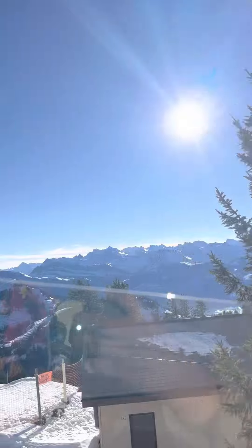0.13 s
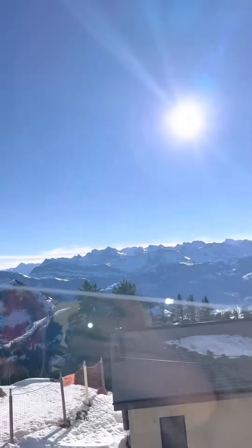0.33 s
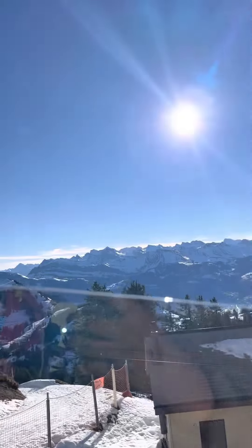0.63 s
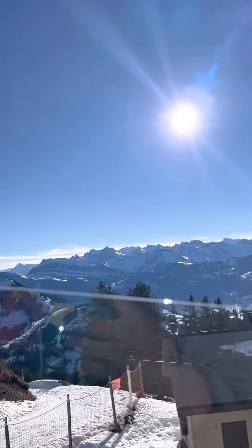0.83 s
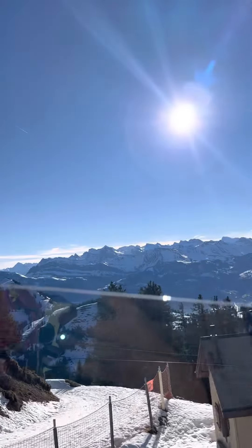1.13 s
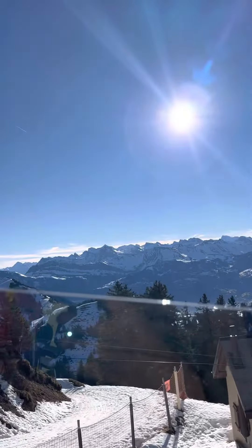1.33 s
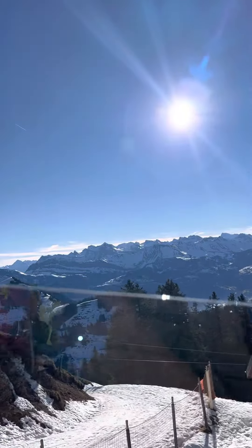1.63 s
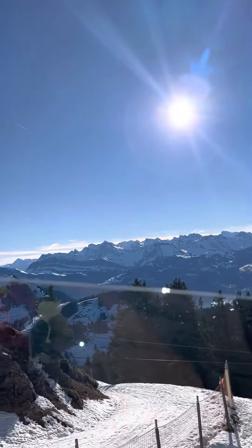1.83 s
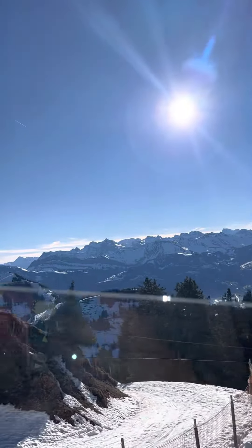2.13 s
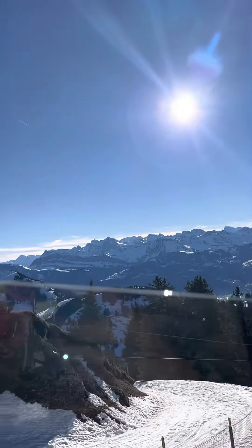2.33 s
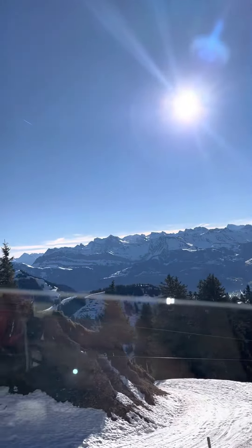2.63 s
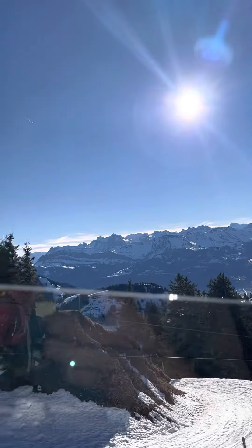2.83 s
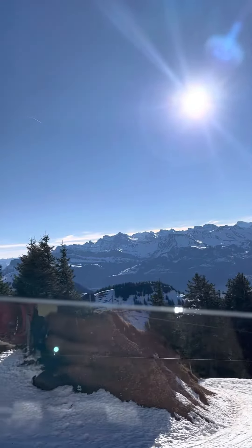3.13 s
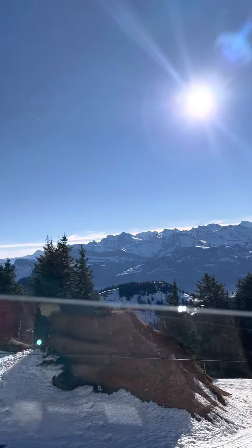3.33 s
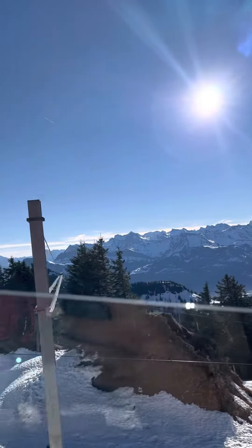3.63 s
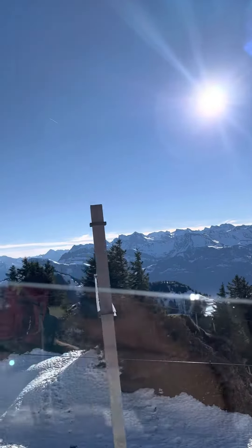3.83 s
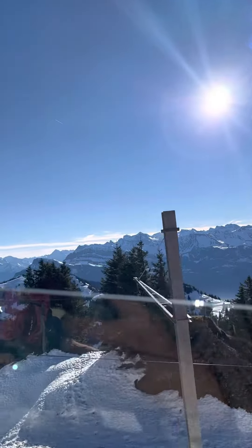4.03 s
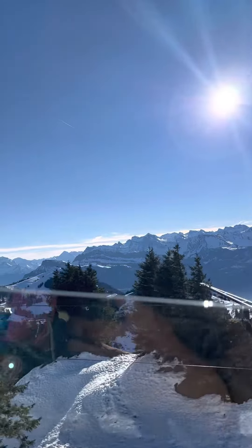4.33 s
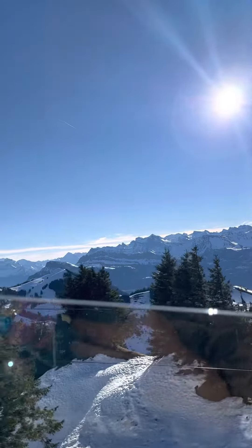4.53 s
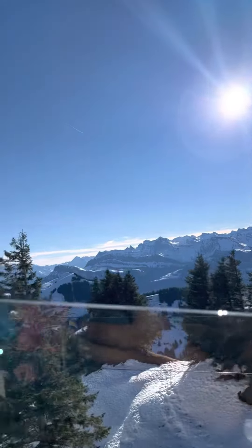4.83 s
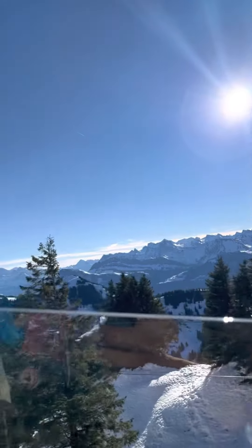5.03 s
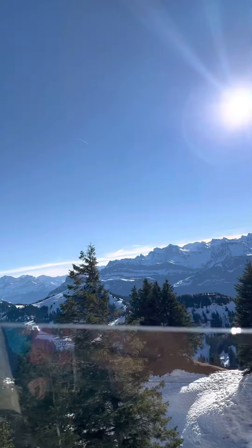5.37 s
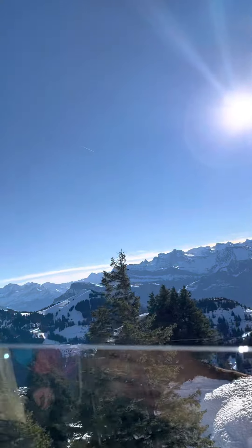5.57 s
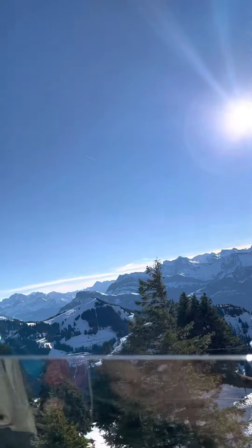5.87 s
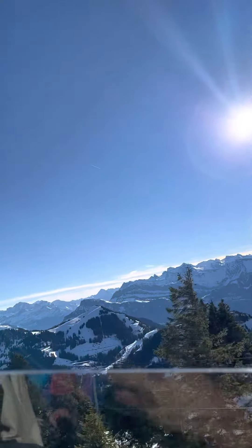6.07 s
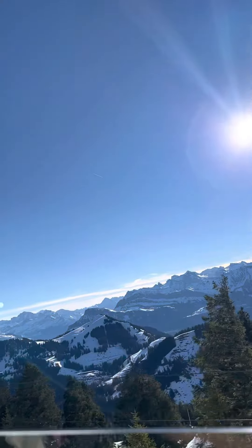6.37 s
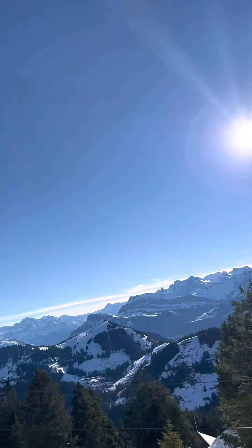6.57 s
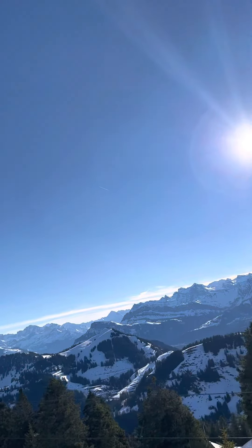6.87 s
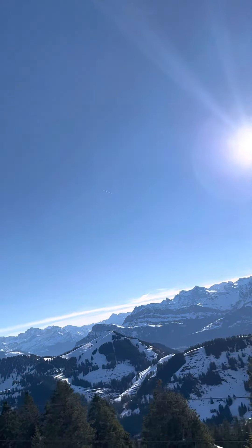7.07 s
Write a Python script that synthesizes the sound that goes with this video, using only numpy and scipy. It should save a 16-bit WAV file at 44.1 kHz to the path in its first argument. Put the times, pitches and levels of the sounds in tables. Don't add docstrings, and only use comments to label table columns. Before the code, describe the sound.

Deep cogwheel hum and floor boom rise, then run on evenly, with tiny early squeaks, dull knocks and low wind buffets at a window.

```python
import sys
import numpy as np
from scipy import signal
from scipy.fft import rfft, irfft, next_fast_len
from scipy.io import wavfile
from scipy.ndimage import uniform_filter1d, map_coordinates

SR = 44100
rng = np.random.default_rng(int(sys.argv[2]) if len(sys.argv) > 2 else 0)


def dump(signal):
    limited = np.clip(np.atleast_2d(signal).T, -1, 1)
    pcm = np.round(limited * 32767).astype(np.int16)
    wavfile.write(sys.argv[1], SR, pcm)


def elevation(decibels):
    levels = np.asarray(decibels, float)
    return 10 ** (levels / 20)


N = 317520

# t/s, level/dB
LEVEL = [(0.04, -16), (0.45, -14.5), (0.8, -12.5), (1.25, -7.5), (1.45, -5), (1.55, -2.5), (1.75, -2),
         (1.95, 1), (2.8, 0), (3.4, 0.5), (4, 0), (4.8, -0.5), (5.2, 0), (5.9, -1), (6.6, -1.5), (7, -1),
         (7.2, 0.5)]
# t/s, level/dB
TICK = [
    (5.387, -25),
]


def unit(x):
    return x / np.sqrt(np.mean(x ** 2) + 1e-20)


def along(points, hz):
    f, v = np.transpose(points)
    return np.interp(np.log(hz + 1), np.log(f + 1), v)


def curves(rows):
    s, *cols = np.transpose(rows)
    return [np.interp(np.arange(N) / SR, s, c) for c in cols]


def wobble(rate):
    knots = rng.standard_normal(int(N * 60 / SR) + 4)
    return map_coordinates(knots, [np.arange(N) * min(rate, 60) / SR])


def filtered(x, response):
    m = next_fast_len(N + 8192)
    return irfft(rfft(x, m) * response(np.fft.rfftfreq(m, 1 / SR)), m)[..., :N]


def panels(hz):
    # f/Hz, width/Hz, lift/dB
    resonances = [(68, 9.6, 8), (138.7, 9.6, 8), (157.7, 2.3, 3), (798, 110, 3), (434, 56, 12),
                  (625, 24, 3.5), (1317, 140, 4.5), (2665, 200, 5.5), (3580, 174, 3), (4200, 48, 3.5),
                  (7230, 900, 8)]
    return elevation(sum(db / (1 + (2 * (hz - c) / w) ** 2) for c, w, db in resonances))


def noise(spectrum, patchy_db):
    z = signal.stft(rng.standard_normal((3, N)), nperseg=512)[2]
    field = uniform_filter1d(rng.standard_normal(z.shape[1:]), size=5, axis=0)
    field = uniform_filter1d(field, size=10, axis=1)
    x = signal.istft(z * elevation(patchy_db * unit(field)), nperseg=512)[1][:, :N]
    return unit(filtered(x, lambda hz: elevation(along(spectrum, hz)) * panels(hz)))


def cog():
    # t/s, rack teeth/Hz, axle turns/Hz
    speed = [(0, 48.3, 4.3), (2, 48.25, 4.3), (3, 48.3, 4.27), (4.6, 48.25, 4.3), (5.4, 48.4, 4.45),
             (6.2, 47.6, 4.32), (7.2, 47.5, 4.3)]
    # t/s, axle sideband under the hum/dB
    out_of_round = [(0, -6), (1.2, -5), (2.2, -15), (2.8, -10), (3.4, -3.5), (4.2, -6), (4.8, -3.5),
                    (5.8, -7), (6.3, -3), (7.2, -4)]
    # order (of tooth rate), level under the hum/dB, loudest at t/s, fall either side/(dB/s)
    mesh = [
        (2, -13, 3.6, 0),
        (2.885, -10, 7, .5),
        (4.35, -13.5, 7, .5),
        (16, -27, 7.1, 4),
        (17, -26, 5.7, 2.5),
        (18, -26, 2.8, 1.5),
    ]
    axle_lag = .32
    turn, axle = 2 * np.pi * np.cumsum(curves(speed), axis=1) / SR
    hum_db = -22.5 + curves(LEVEL)[0]
    side_db = hum_db + curves(out_of_round)[0]
    hum = elevation(hum_db) * np.cos(turn)
    hum += elevation(side_db) * np.cos(turn + axle - 2 * np.pi * axle_lag)
    for order, db, s, fall_db in mesh:
        away_s = abs(np.arange(N) / SR - s)
        tone_db = hum_db + db - fall_db * away_s + 3 * wobble(9)
        hum += elevation(tone_db) * np.cos(order * turn + 1.1 * wobble(9))
    return np.sqrt(2) * hum


def bumps():
    # t/s, floor lift/dB, panel lift/dB
    uneven_rail = [(.12, 5, -2), (1.47, 6.5, -0.5), (1.63, -2.5, 5.5), (1.839, 0.5, 2), (2.05, 5.5, 7),
                   (2.17, 8.5, 1.5), (2.31, 12.5, -1), (2.55, -2.5, 4), (2.69, 3, 1.5), (2.83, 4.5, 5.5),
                   (3.19, 4.5, 0.5), (3.58, 6.5, 1.5), (3.72, -3.5, 0.5), (3.929, 7.5, -0.5),
                   (4.08, -3.5, -2.5), (4.36, 6.5, -1.5), (4.469, -9, 5.5), (4.53, 6.5, 1.5),
                   (4.6, 1.5, 3.5), (4.73, -3.5, 3.5), (4.97, 8, 0), (5.26, -4.5, 3), (5.52, 1.5, 7),
                   (5.7, 4.5, 0), (6.05, 5, 3.5), (6.28, 1, 4.5), (6.4, 10, 0.5), (6.84, 7, 3.5),
                   (7.04, 9.5, -2), (7.19, 11, -1)]
    half_length_s = 0.028
    s, *lift_db = np.transpose(uneven_rail)
    t = np.arange(0, N, 64) / SR
    humps = np.array(lift_db) @ np.exp(-.5 * ((t - s[:, None]) / half_length_s) ** 2)
    return [np.interp(np.arange(N) / SR, t, h) for h in humps]


def body():
    # f/Hz, level/dB per Hz
    boom_spectrum = [(20, -37.5), (31, -23.5), (42, -21), (56, 2.5), (68, 1.5), (82, 8), (95, -1.5),
                     (115, -4.5), (160, -59)]
    drone_spectrum = [(65, -17.5), (85, -8), (106, 1), (116, -5), (130, -10), (152, -4), (172, -7),
                      (230, -12), (265, -11), (300, -14), (350, -21), (450, -67.5)]
    roar_spectrum = [(220, -24), (300, -4.5), (380, -6.5), (450, -8), (560, -11), (700, -14.5), (900, -14),
                     (1100, -22.5), (1500, -31.5), (2500, -62)]
    overall_db, = curves(LEVEL)
    floor_db, panel_db = bumps()
    later_s = np.arange(N) / SR - 3.6
    boom_db = -25.5 + overall_db + floor_db + 0.65 * wobble(12)
    drone_db = -24.5 + overall_db + panel_db - 0.13 * later_s + 0.62 * wobble(12)
    roar_db = -33 + overall_db + 0.31 * panel_db + 0.92 * wobble(14)
    boom = elevation(boom_db) * noise(boom_spectrum, patchy_db=1.4)
    drone = elevation(drone_db) * noise(drone_spectrum, patchy_db=0.8)
    roar = elevation(roar_db) * noise(roar_spectrum, patchy_db=1.33)
    return boom + drone + roar


def rush():
    # f/Hz, level/dB per Hz
    hiss_spectrum = [(700, -19.5), (1100, -4), (1600, -3), (2300, 0.5), (3000, -3), (4300, -3), (5400, -9),
                     (6500, -16.5), (8400, -23), (10500, -27.5), (12200, -44), (14500, -52), (15600, -56.5)]
    sway_hz, sway_lag = 2.2, 0.13
    sway_db = -0.3 * np.cos(2 * np.pi * (sway_hz * np.arange(N) / SR - sway_lag))
    level_db = -40 + curves(LEVEL)[0] + 0.088 * bumps()[1] + sway_db
    jolts = np.zeros(N)
    draws = rng.random((400, 2))
    jolts[(draws[:, 0] * N).astype(int)] = -.11 * np.log(1 - draws[:, 1])
    decay = np.exp(-np.arange(SR // 10) / SR / .015)
    jolts = signal.fftconvolve(jolts, decay)[:N]
    return elevation(level_db + 0.3 * wobble(10)) * unit((1 + jolts) * noise(hiss_spectrum, patchy_db=0.77))


def draught():
    # t/s, peak level/dB, fall either side/(dB/s)
    gusts = [(.37, -56, 110), (1.1, -67, 60), (1.25, -54, 112), (1.53, -63, 60), (2.1, -50, 204),
             (2.3, -46, 100), (2.65, -33.5, 124), (3.03, -32, 111), (3.17, -39, 143), (3.33, -30, 250),
             (3.49, -28.5, 150), (3.58, -34, 130), (3.79, -38, 200), (4.22, -30.5, 199), (4.51, -28.5, 150),
             (4.581, -27, 198), (4.77, -32, 136), (4.9, -32.5, 58), (5.32, -29.5, 60), (5.41, -29, 148),
             (5.53, -29.5, 44), (5.73, -30.5, 103), (5.9, -32.5, 284), (5.97, -29, 398),
             (6.049, -26.5, 557), (6.42, -54, 95), (6.8, -57, 98), (7, -28.5, 235), (7.06, -33, 112)]
    # f/Hz, level/dB per Hz
    eddy_spectrum = [(15, -8), (45, 4.5), (70, 3), (200, 2.5), (320, -4), (600, -14), (1000, -22),
                     (2000, -79.5)]
    t = np.arange(0, N, 64) / SR
    gust_db = np.max([db - fall * abs(t - s) for s, db, fall in gusts], axis=0)
    still_db = -64 + curves(LEVEL)[0]
    level_db = np.maximum(np.interp(np.arange(N) / SR, t, gust_db), still_db)
    eddies = rng.standard_normal((2, 2, N))
    low = unit(filtered(eddies[0], lambda hz: elevation(along(eddy_spectrum, hz))))
    bright = unit(filtered(eddies[1], lambda hz: elevation(along(eddy_spectrum, hz / 0.68)) * hz / (hz + 250)))
    bright_db = 2.9 * (np.minimum(level_db, -33) + 36.5) - 14.0
    lumps = elevation(2.4 * np.array([wobble(25), wobble(25)]))
    return elevation(level_db + 2.0) * unit(lumps) * (low + elevation(bright_db) * bright)


def fittings():
    # t/s, level/dB, f/Hz
    squeaks = [
        (2.055, -39, 2690),
        (2.215, -31, 2600),
        (2.4, -37, 3470),
        (2.628, -33, 2200),
        (2.645, -31, 2260),
        (2.655, -33, 2220),
        (2.85, -36, 3530),
    ]
    x, t = np.zeros(N), np.arange(SR // 40) / SR
    swell = t / 0.0043 * np.exp(1 - t / 0.0037)
    for s, db, hz in squeaks:
        x[round(s * SR):][:len(t)] += elevation(db) * np.sin(2 * np.pi * hz * t) * swell
    return x


def knocks():
    # t/s, peak level/dB, f/Hz
    panel_blows = [(3.329, -12, 244), (3.573, -16.5, 121.5), (4.447, -11.5, 198), (4.501, -10, 220),
                   (4.577, -11, 283), (4.649, -13, 151), (4.761, -13.5, 160), (5.109, -19.5, 212),
                   (5.146, -21, 215), (5.452, -14, 217), (5.519, -22, 148), (5.559, -12, 141),
                   (5.734, -15, 135), (6.038, -14.5, 149), (6.29, -20, 192), (6.389, -14, 160)]
    # t/s, peak level/dB, f/Hz
    floor_blows = [
        (2.85, -14.5, 62.4),
        (3.33, -21, 55.2),
        (4.336, -14, 78),
        (4.515, -13.5, 60.7),
        (5.563, -12.5, 68),
        (5.819, -16, 61),
        (6.033, -25, 65.6),
        (6.125, -12, 74.7),
        (6.378, -20.5, 74),
        (7.16, -13, 61.6),
    ]
    rise_cycles = 1.23
    x, t = np.zeros(N + SR), np.arange(SR // 4) / SR
    for s, db, hz in [*panel_blows, *floor_blows]:
        u = t * hz / rise_cycles
        swing = u * np.exp(1 - u) * np.sin(2 * np.pi * hz * t)
        x[round(s * SR):][:len(t)] += elevation(db - 3.5) * swing
    return x[:N]


def pops():
    # t/s, level/dB, left over right/dB
    bursts = [
        (3.572, -23, -3),
        (4.573, -26, -5),
        (4.898, -38, 5),
        (5.488, -23, -1),
        (5.732, -37, 2),
        (6.037, -33, -1),
    ]
    x, u = np.zeros((2, N)), np.arange(SR // 50) / SR / 0.00054
    push = u * u * (3 - u) * np.exp(-u)
    for s, db, pan_db in bursts:
        side_db = np.array([[1.5], [-1.5]]) * pan_db
        x[:, round(s * SR):][:, :len(u)] += elevation(db + 9 + side_db) * push
    return x


def tick():
    x, t = np.zeros(N), np.arange(SR // 500) / SR
    for s, db in TICK:
        x[round(s * SR):][:len(t)] = elevation(db - 60 * t / .0005) * np.cos(2 * np.pi * 6000 * t)
    return x * [[1], [.4]]


def ports(direct, diffuse):
    # f/Hz, likeness/0-1, right lead/rad, left over right/dB
    spacing = [(60, .9999, 0, 0), (120, .999, .03, 0), (250, .975, .18, 0), (430, .93, .2, .3),
               (600, .8, .3, 1), (780, .66, .2, 3.5), (1100, .66, .3, 3.5), (1300, .68, .4, 2),
               (1750, .85, -.2, 0), (2600, .62, -1.9, -1), (3700, .58, -1.1, 1), (4700, .3, -2.2, -.6),
               (6000, .75, -3.1, 0), (8100, .8, -6.3, 0), (15600, .8, -17.1, 0)]
    f, alike, lead, tilt_db = np.transpose(spacing)

    def share(hz):
        return np.clip(np.interp(hz, f, alike), 0, 1)

    def sides(hz):
        half = np.exp(.5j * np.interp(hz, f, lead)) / elevation(np.interp(hz, f, tilt_db) / 2)
        return np.array([1 / half, half])

    shared = filtered(direct, lambda hz: sides(hz) * np.sqrt(share(hz)))
    differing = filtered(diffuse, lambda hz: abs(sides(hz)) * np.sqrt(1 - share(hz)))
    return shared + differing


def scene():
    air = body() + rush()
    return ports(air[0] + cog() + knocks() + fittings(), air[1:]) + draught() + pops() + tick()


def thinned_bands(x):
    # from f/Hz, to f/Hz, frames kept/0-1
    sum_gaps = [(5250, 5680, .8), (5680, 6260, .02), (6260, 6650, .65), (9050, 9650, .6), (9650, 11000, -1),
                (11000, 11400, .6), (13350, 13780, .6), (13780, 22050, -1)]
    difference_gaps = [(7550, 8900, -1), (11350, 11750, .5), (11750, 13150, -1), (13150, 13500, .3),
                       (13500, 13900, .75), (14300, 14750, .75), (14750, 15150, .5), (15150, 15450, .05),
                       (15450, 22050, -1)]
    pair = np.pad([x[0] + x[1], x[0] - x[1]], [(0, 0), (0, 2048)], "reflect") / 2
    hz, t, z = signal.stft(pair, SR, nperseg=1024)
    steady = abs(t - TICK[0][0]) > .006
    early = .5 * (t < 2)
    for part, gaps in enumerate([sum_gaps, difference_gaps]):
        for low_hz, high_hz, kept in gaps:
            draws = np.repeat(rng.random(len(t)), 2)[:len(t)]
            dropped = steady & (draws > kept + early)
            z[part][np.ix_((hz > low_hz) & (hz < high_hz), dropped)] = 0
    lost = np.clip((hz - 4000) / 9000, 0, .6)[:, None] * steady
    z = z * (rng.random(z.shape) > lost) / np.sqrt(1 - lost)
    both, apart = signal.istft(z, SR, nperseg=1024)[1][:, :N]
    return np.array([both + apart, both - apart])


def roll_off(x):
    return signal.sosfilt(signal.butter(12, 15600, fs=SR, output="sos"), x)


def record(dry):
    start_s, rise_s, stop_s = .036, .0012, .002
    mix = thinned_bands(filtered(dry, lambda hz: hz ** 4 / (hz ** 4 + 27 ** 4)))
    t = np.arange(N) / SR
    mix = mix * np.clip((t - start_s) / rise_s, 0, 1)
    mix = mix * np.sin(np.pi / 2 * np.clip(t[::-1] / stop_s, 0, 1)) ** 2
    return roll_off(mix)


dry = scene()
out = record(dry)
dump(out)
```